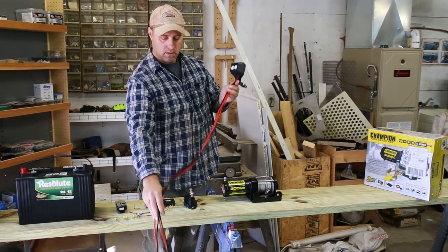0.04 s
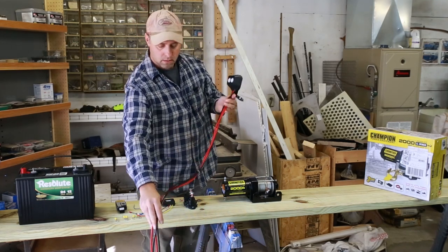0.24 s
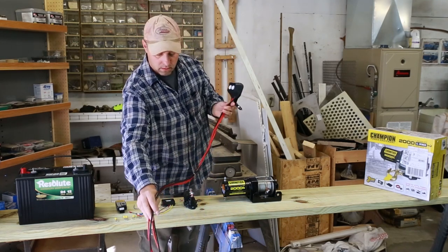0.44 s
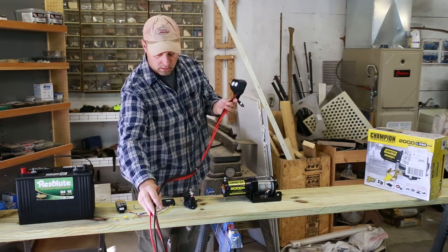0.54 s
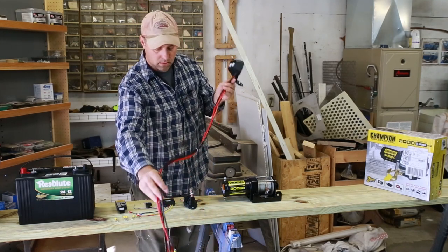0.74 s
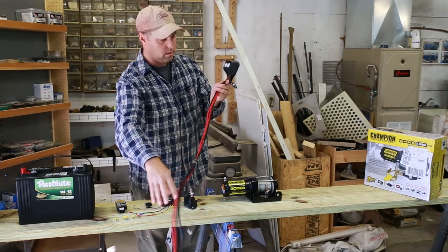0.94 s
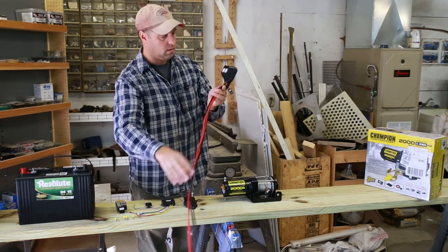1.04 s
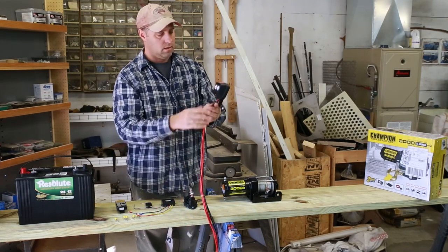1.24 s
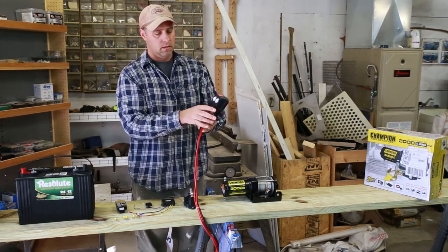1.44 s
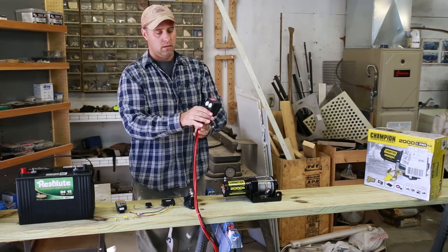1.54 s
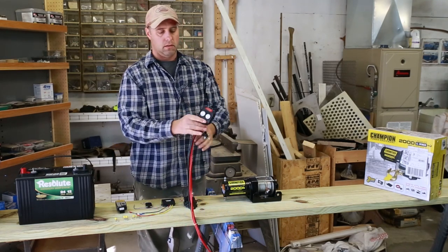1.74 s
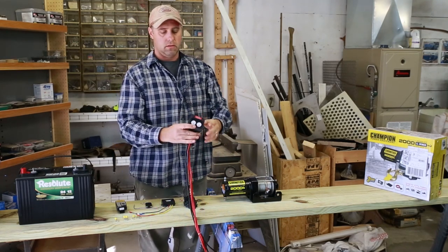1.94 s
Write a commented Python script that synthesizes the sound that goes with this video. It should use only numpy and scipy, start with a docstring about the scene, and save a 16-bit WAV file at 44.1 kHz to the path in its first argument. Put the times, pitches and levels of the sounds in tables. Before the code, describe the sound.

Thick cables slide and knock against a wooden bench, followed by small plastic clicks.

```python
"""Cables on a workbench

Heavy cables drag over a wooden bench, knock against it and drop with a clatter that sets steel ringing.
Sleeves and cable rustle; then a plastic hand controller clicks sharply, nearer the microphone.
The workshop rumbles quietly and reverberates; a noise suppressor shortens faint tails.
Only the left channel is audible."""
import sys
import numpy as np
from scipy import signal
from scipy.io import wavfile
from scipy.ndimage import uniform_filter1d

SR = 44100
rng = np.random.default_rng(int(sys.argv[2]) if len(sys.argv) > 2 else 0)


def output_pcm(signal):
    """Save a mono or channel-first signal as 16-bit PCM at the path in sys.argv[1].

    Samples are clipped to [-1, 1] before scaling.
    """
    pcm = np.clip(np.atleast_2d(signal).T, -1, 1) * 32767
    wavfile.write(sys.argv[1], SR, np.round(pcm).astype(np.int16))


N = 88200
TIME = np.arange(N) / SR


def from_db(db):
    """Amplitude ratio of a level in decibels."""
    return 10 ** (np.asarray(db) / 20)


def at_hz(curve, hz):
    """Interpolation along a logarithmic frequency axis."""
    frequencies, values = np.array(curve).T
    return np.interp(np.log(hz), np.log(frequencies), values)


def unit_rms(x):
    """Power normalisation to an rms of 1."""
    return x / np.sqrt(np.mean(x ** 2) + 1e-20)


def unit_blow(x, window_s=.05):
    """Energy normalisation: a transient gets the energy of an rms of 1 held for window_s."""
    return x * np.sqrt(window_s * SR / (np.sum(x ** 2) + 1e-20))


def butterworth(x, hz, kind, order=2):
    """Filtering with a maximally flat passband."""
    sections = signal.butter(order, np.clip(hz, 10, SR * .47), kind, fs=SR, output="sos")
    return signal.sosfilt(sections, x + 1e-18)


def add(out, start_s, x):
    """Superposition: x joins the mix at start_s."""
    i = int(np.clip(start_s * SR, 0, N - 1))
    out[i:i + len(x)] += x[:N - i]


def ring(modes, spread_db):
    """Free vibration: a sum of damped modes of alternating sign, their levels scattered by spread_db."""
    t = TIME[:SR]
    out = np.zeros(SR)
    for k, (hz, db, t60) in enumerate(modes):
        decay = from_db(db + spread_db * rng.standard_normal() - 60 * t / t60)
        out += (-1) ** k * decay * np.sin(2 * np.pi * hz * t)
    return unit_blow(out)


def noise_bands():
    """Band decomposition: half octaves of white noise as (centre_hz, samples)."""
    edges = 16 * 2 ** (np.arange(21) / 2)
    white = rng.standard_normal((2, N + SR // 4))
    return [(np.sqrt(low * top), butterworth(white[k % 2], [low, top], "band")[-N:])
            for k, (low, top) in enumerate(zip(edges, edges[1:]))]


# Spectrum of the steady background: frequency_hz, relative_density_db
NOISE_SPECTRUM = [(20, -7), (52, 4.5), (85, -2), (130, -15.5), (220, -27.5), (600, -30), (1200, -29.5),
                  (2500, -35), (4000, -52.5), (8500, -53), (11000, -101), (16000, -48)]
def room_noise(noise_db=-50, hum_hz=154.5, hum_db=-65):
    """Stationary noise: a continuous spectrum of rumble and faint hiss, with one weak line of hum."""
    rumble = unit_rms(sum(from_db(at_hz(NOISE_SPECTRUM, hz)) * band for hz, band in noise_bands()))
    return from_db(noise_db) * rumble + from_db(hum_db) * np.sin(2 * np.pi * hum_hz * TIME)


# Reverberation time of the workshop: frequency_hz, t60_s
ROOM_DECAY = [(100, 0.68), (280, 0.32), (600, 0.62), (1200, 0.34), (2400, 0.46), (4500, .35), (9000, 0.17),
              (15000, 0.38)]
def room_responses(count, build_s=.0015, early_db=-3, early_s=0.09):
    """Diffuse decay from several places: strong early reflections, each band dying at its own rate."""
    hz, bands = map(np.array, zip(*noise_bands()))
    t = TIME[:SR * 3 // 4]
    fade = from_db(-60 * t / at_hz(ROOM_DECAY, hz)[:, None])
    swell = np.minimum(t / build_s, 1) * (1 + from_db(early_db) * np.exp(-t / early_s))
    offsets = rng.integers(0, N - len(t), count)
    tails = [swell * np.sum(fade * bands[:, i:i + len(t)], axis=0) for i in offsets]
    return [tail / np.linalg.norm(tail) for tail in tails]


def reverberation(x, room):
    """Convolution with the room's impulse response gives the reflected sound."""
    return signal.fftconvolve(x, room)[:N]


# Soft bumps of slack cable and hands: start_s, level_db, pitch_hz, t60_s
SOFT_BUMPS = [(.04, -54.5, 321.5, 0.088), (.272, -51.5, 158, 0.13), (0.37, -47, 50.7, 0.14),
              (0.803, -54.5, 318, 0.11), (0.863, -51, 160.5, 0.077), (1.294, -49.5, 122.3, 0.22),
              (1.313, -45, 87, .2), (1.543, -58.5, 125, .15), (1.714, -56, 285, .15),
              (1.752, -56, 200, 0.062)]
def cable_bumps(room, direct_db=-1.0, room_db=-3.5):
    """Damped oscillation: each soft impact rings at a single low pitch."""
    out = np.zeros(N)
    for start_s, level_db, pitch_hz, t60_s in SOFT_BUMPS:
        mode = ring([(pitch_hz, 0, t60_s)], spread_db=0)
        bump = unit_blow(butterworth(mode, 2 * pitch_hz, "low"))
        add(out, start_s, from_db(level_db) * bump)
    return from_db(direct_db) * out + from_db(room_db) * reverberation(out, room)


# Sliding strokes of cable and sleeve: start_s, length_s, level_db, low_hz, top_hz
STROKES = [(0, 0.096, -54.5, 926, 2780), (0.042, .06, -55, 1290, 4070), (0.092, 0.051, -49.5, 700, 2240),
           (0.112, 0.0088, -54.5, 4500, 6550), (0.136, .115, -58, 2550, 2877),
           (0.264, 0.053, -63.5, 3700, 4860), (0.558, 0.061, -76.5, 545, 2230),
           (0.798, 0.15, -48.5, 880, 2600), (0.846, 0.027, -52.5, 3200, 5080),
           (1.059, 0.056, -68, 3130, 3700), (1.537, 0.065, -60, 2600, 4260),
           (1.21, 0.11, -43.5, 1110, 2916), (1.356, 0.084, -40, 590, 2280), (1.425, 0.2, -53, 648, 1168),
           (1.784, 0.08, -52.5, 1944, 3330)]
def sliding_rustle(room, slips_per_s=3300, spread_db=3.5, attack_s=0.0089, release_s=0.004, gain_db=-6):
    """Stick-slip friction: dense little slips merge into a rustle that swells and fades with each move."""
    out = np.zeros(N)
    for start_s, length_s, level_db, low_hz, top_hz in STROKES:
        slips = (rng.random(N) < slips_per_s / SR) * rng.choice([-1, 1], N)
        strength = from_db(spread_db * np.minimum(rng.exponential(1, N), 4))
        rustle = unit_rms(butterworth(slips * strength, [low_hz, top_hz], "band", order=3))
        attack = np.clip((TIME - start_s) / attack_s, 0, 1)
        release = np.exp(-np.maximum(TIME - start_s - length_s, 0) / release_s)
        out += from_db(level_db) * attack * release * rustle
    return from_db(gain_db) * (out + reverberation(out, room))


# Modes of the controller's plastic shell: pitch_hz, relative_level_db, t60_s
SHELL_MODES = [(1230, -9.5, .015), (2390, 2, 0.054), (3480, 14.5, 0.0037), (4030, 4.5, 0.033),
               (4730, -30.5, 0.025), (6170, 8.5, 0.0069), (7380, 6, 0.011), (12600, -26, 0.021)]
# Clicks of the shell: start_s, level_db, direct_to_reverberant_db
SHELL_CLICKS = [(1.632, -70, 0), (1.71, -65.5, -2.5), (1.782, -66, -2), (1.801, -61, 11), (1.81, -65, -21),
                (1.8263, -59.5, -5), (1.8514, -60.5, 1.5), (1.8555, -94, 1), (1.9370, -50, 8.5),
                (1.938, -57, 20), (1.9450, -78.5, 32.5), (1.9464, -62, 16), (1.9676, -64, 5)]
def controller_clicks(room, snap_hz=(2734, 4670), crack_hz=(6800, 11300), shell_db=-12):
    """Impulse excitation: stiff plastic snaps and the shell rings briefly; harder clicks are brighter."""
    direct, into_room = np.zeros(N), np.zeros(N)
    impulse = signal.unit_impulse(SR)
    pulse = unit_blow(butterworth(impulse, snap_hz, "band"))
    crack = unit_blow(butterworth(impulse, crack_hz, "band"))
    hardest_db = max(row[1] for row in SHELL_CLICKS)
    for start_s, level_db, direct_db in SHELL_CLICKS:
        shell = from_db(shell_db) * ring(SHELL_MODES, spread_db=5)
        crack_db = -15.5 + 0.87 * (level_db - hardest_db)  # relative to the pulse
        snap = from_db(level_db) * (pulse + shell + from_db(crack_db) * crack)
        add(into_room, start_s, snap)
        add(direct, start_s, from_db(direct_db) * snap)
    return direct + reverberation(into_room, room)


# Modes of the ringing steel: pitch_hz, relative_level_db, t60_s
STEEL_MODES = [(592, 10, 0.65), (820, 2, 0.55), (943, 5, .8), (1205, 4.5, 1), (1263, 20, 0.17),
               (1384, -56, 0.95), (1361, 24.5, 0.12), (1610, -18, .5), (1670, -27.5, 0.25),
               (1800, -16.5, 0.34), (2112, -4.5, .35), (2374, 9, 0.71), (2799, 11.5, .4)]
# Cable ends striking the bench; the later levels are relative to level_db:
# start_s, level_db, low_hz, top_hz, direct_db, tick_db, thud_db, thud_hz, steel_db
BENCH_KNOCKS = [ (0.0608, -48, 750, 2500, -30, -49, -2, 293, -38),
                (.098, -53.5, 740, 3350, -3, -58, -7.5, 429, -35),
                (0.2689, -44, 2040, 2685, -16, -30.5, -10, 280, -46),
                (0.5523, -45.5, 556, 2067, -12, -59.5, -8.5, 339, -34),
                (0.8518, -37, 602, 2150, -1.5, -69, -7, 335, -15),
                (1.046, -59, 1400, 1890, -33, -42, -23, 400, -13),
                (1.2535, -36.5, 1260, 1660, -4.5, -44, -9.5, 324, -16),
                (1.2725, -35.5, 1020, 1590, -8.5, -18.5, -6.5, 321, -7.5),
                (1.2826, -37, 875, 2810, -4, -28, -10, 480, 2.5),
                (1.2957, -40, 1535, 2590, -9, -14, -10.5, 313, -21),
                (1.3091, -52.5, 1400, 2370, 10, -29, -7.5, 423, -5),
                (1.331, -41, 600, 2916, -31, -21.5, -4.5, 266, -10.5),
                (1.486, -61.5, 690, 3024, 2, -30, 3.5, 290, -18),
                (1.534, -49.5, 560, 2490, -11.5, -34, 0.5, 248, -20.5)]
def cable_knocks(rooms, tick_hz=(3240, 8330)):
    """Impact and resonance: a contact pulse with a hard tick and a thud of the board sets steel ringing."""
    out = np.zeros(N)
    impulse = signal.unit_impulse(SR // 10)
    for knock, room in zip(BENCH_KNOCKS, rooms):
        start_s, level_db, low_hz, top_hz, direct_db, tick_db, thud_db, thud_hz, steel_db = knock
        contact = unit_blow(butterworth(butterworth(impulse, low_hz, "high"), top_hz, "low", order=6))
        tick = unit_blow(butterworth(impulse, tick_hz, "band", order=4))
        thud = unit_blow(butterworth(impulse, [thud_hz * .75, thud_hz * 1.3], "band"))
        blow = from_db(level_db) * (contact + from_db(tick_db) * tick + from_db(thud_db) * thud)
        add(out, start_s, from_db(direct_db) * blow)
        add(out, start_s, reverberation(blow, room))
        add(out, start_s, from_db(level_db + steel_db) * ring(STEEL_MODES, spread_db=7.5))
    return out


def suppress_noise(x, depth_db=-7, margin_db=11):
    """Spectral gating: each band is turned down while it is near its own background level."""
    _, _, bins = signal.stft(x, SR, nperseg=512, noverlap=384)
    power = uniform_filter1d(np.abs(bins[0]) ** 2, size=5, axis=0)  # left channel, smoothed in frequency
    power = uniform_filter1d(power, size=5, axis=1)  # and in time
    background = np.percentile(power, 15, axis=1, keepdims=True)
    excess = power / (background * from_db(margin_db) ** 2 + 1e-24)
    gain = from_db(depth_db / (1 + excess ** 2))
    return signal.istft(bins * gain, SR, nperseg=512, noverlap=384)[1][:, :N]


def scene(right_db=-80):
    """Superposition at one microphone, which feeds the left channel; the right is all but silent."""
    bench, sleeves, hands, *places = room_responses(count=len(BENCH_KNOCKS) + 3)
    cables = cable_knocks(places) + cable_bumps(bench) + sliding_rustle(sleeves)
    sound = cables + controller_clicks(hands) + room_noise()
    return np.array([sound, from_db(right_db) * sound])


def record(dry, stopband_hz=17200):
    """Band limiting: a steep low-pass filter follows the noise suppressor."""
    low_pass = signal.cheby2(14, 70, stopband_hz, fs=SR, output="sos")
    return signal.sosfilt(low_pass, suppress_noise(dry))


dry = scene()
out = record(dry)
output_pcm(out)
```